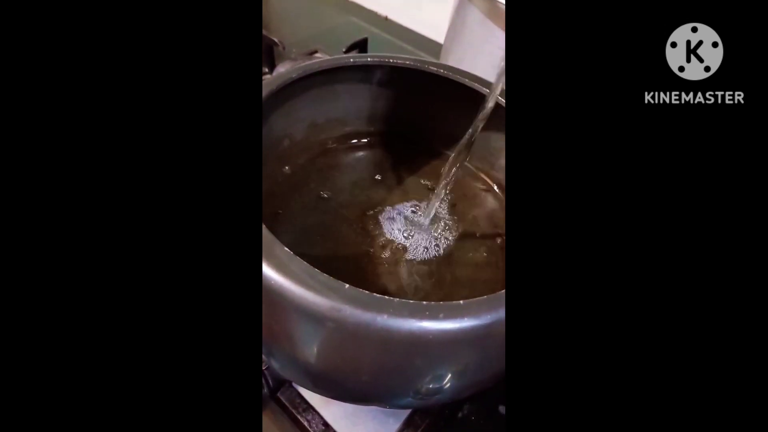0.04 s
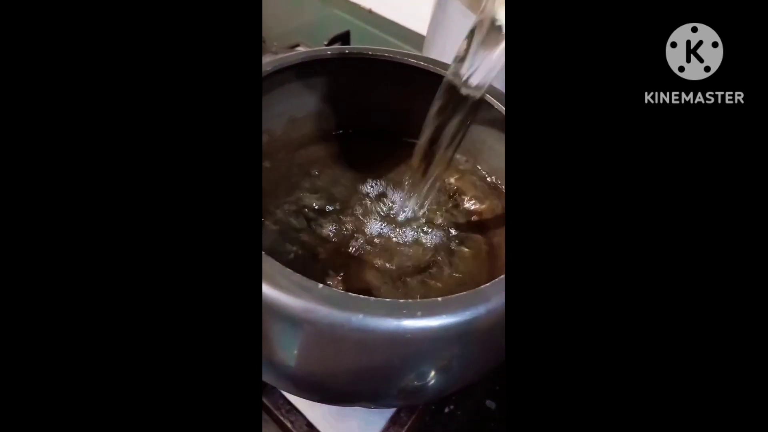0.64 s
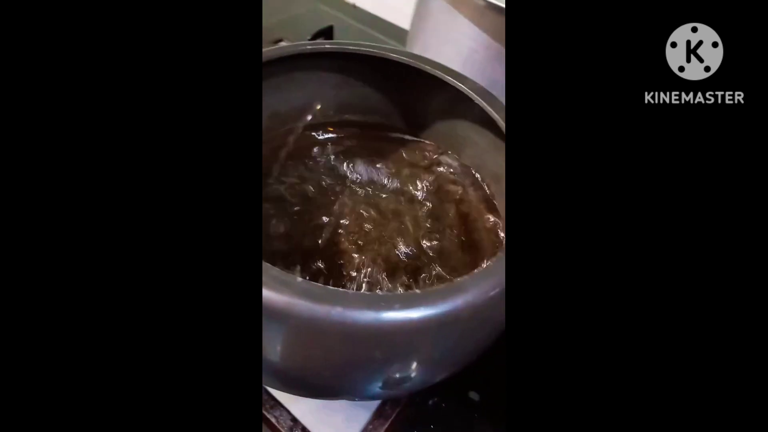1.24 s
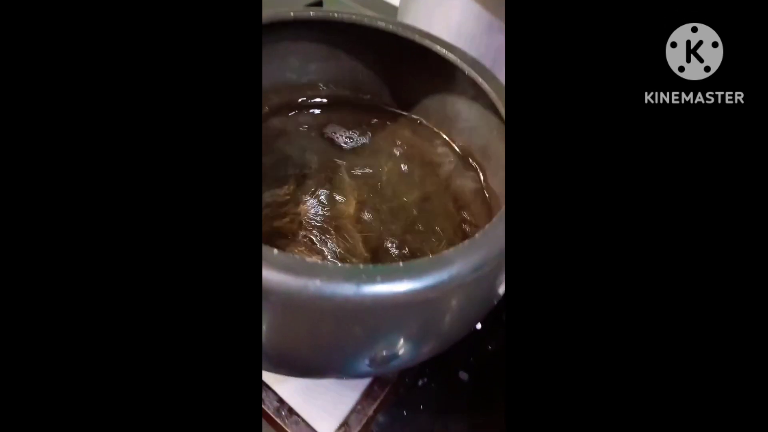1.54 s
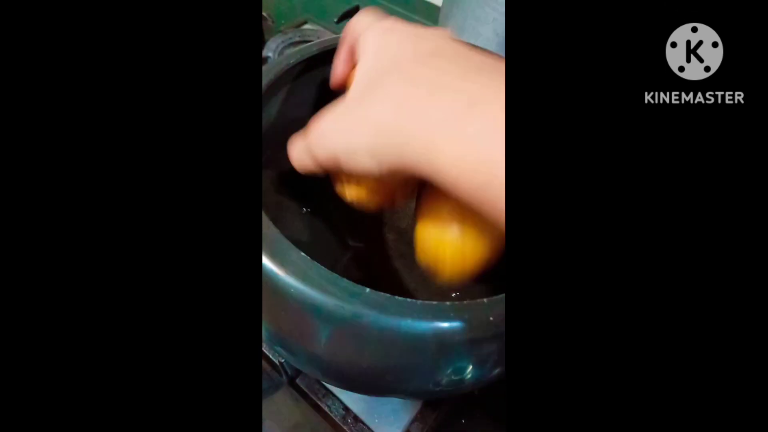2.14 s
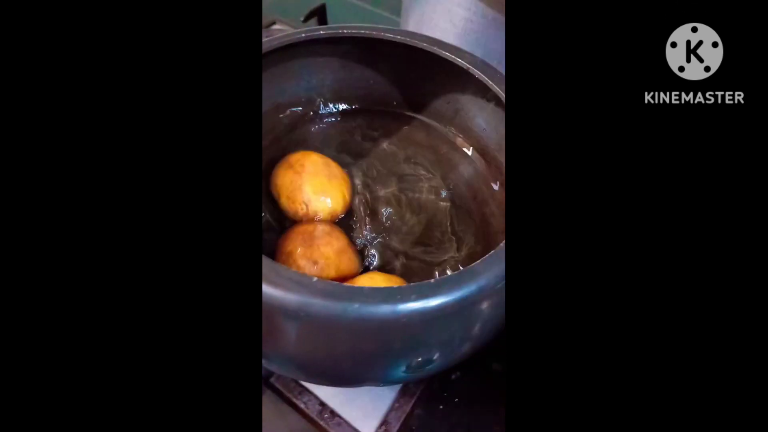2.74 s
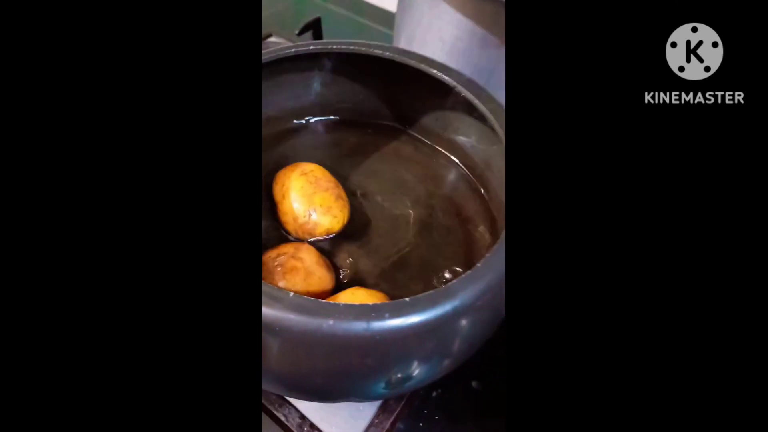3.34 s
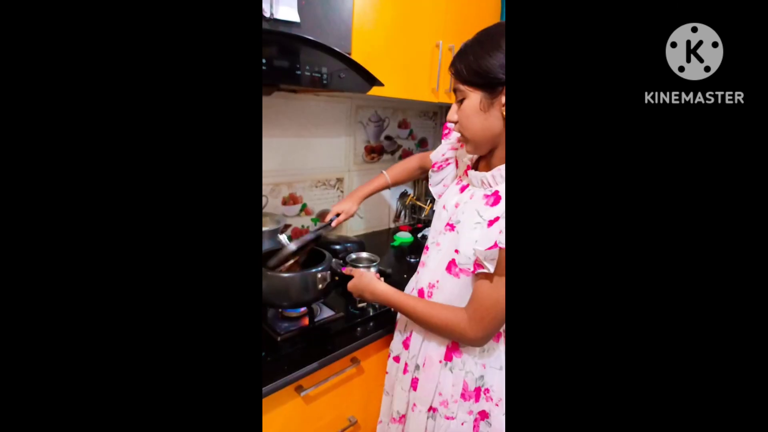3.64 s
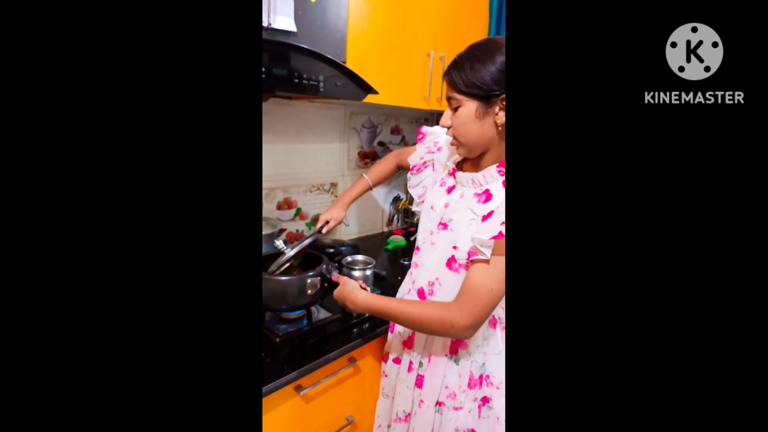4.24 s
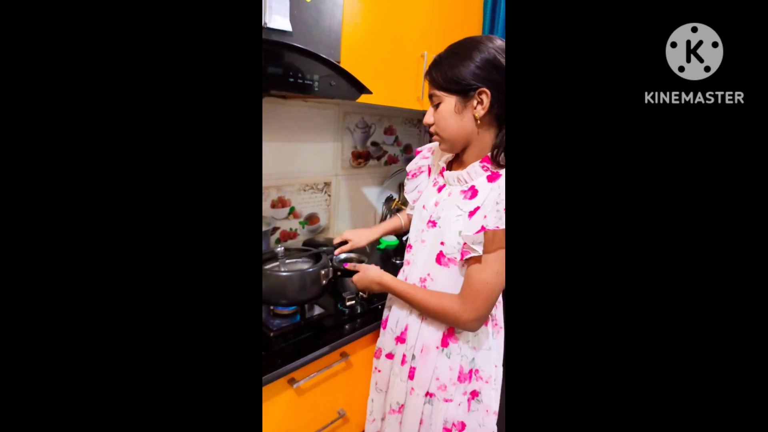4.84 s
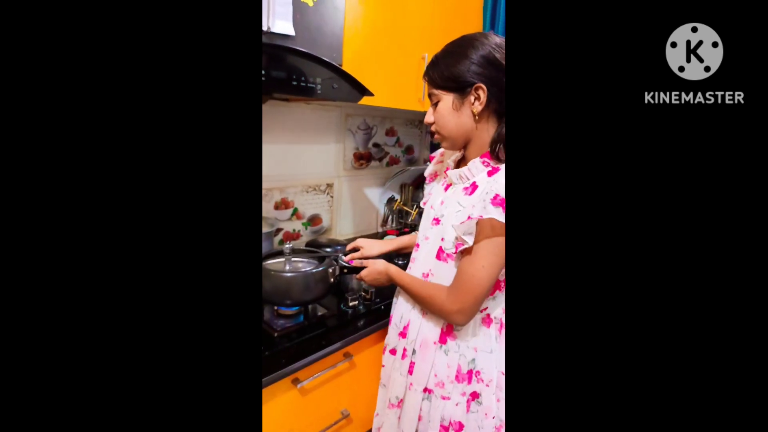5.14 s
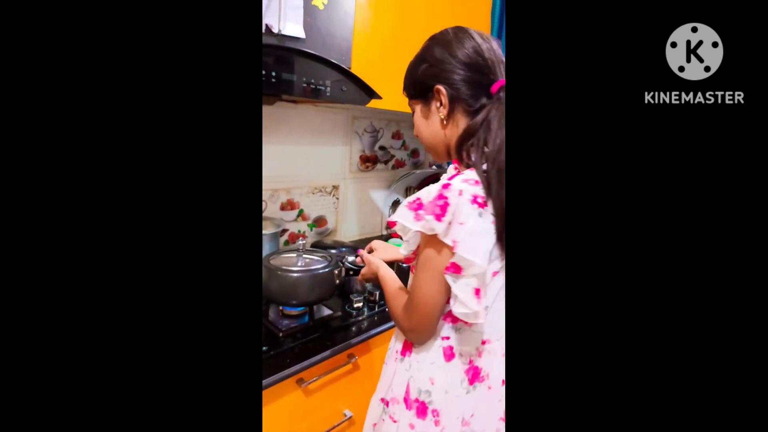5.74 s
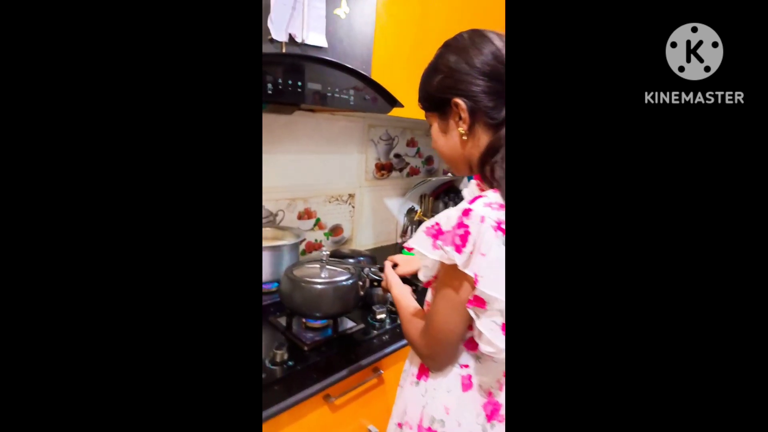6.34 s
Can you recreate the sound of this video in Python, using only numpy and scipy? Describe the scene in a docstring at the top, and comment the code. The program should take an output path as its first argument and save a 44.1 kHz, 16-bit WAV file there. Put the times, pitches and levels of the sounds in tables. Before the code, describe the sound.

Fizzing, gurgling water fills a pressure cooker, potatoes plop in, and its metal lid rattles and scrapes into place in a small kitchen.

```python
"""A small tiled kitchen. Water pours into a metal pressure cooker, fizzing and gurgling as it traps air;
a steel vessel knocks and rings. Potatoes plunge in, tap the wall and bump on the bottom. The lid clatters
in under the rim, scrapes round with a falling stick-slip groan and is clamped shut, jolting the stove.
The three actions are separate segments: the first two are cut off, and each time the next fades in."""
import sys
import numpy as np
from scipy import signal
from scipy.fft import rfft, irfft
from scipy.io import wavfile

SR = 44100
rng = np.random.default_rng(int(sys.argv[2]) if len(sys.argv) > 2 else 0)


def to_wav(s):
    """Save 16-bit WAV."""
    ch = np.atleast_2d(s).T  # columns
    pcm = np.round(np.clip(ch, -1, 1) * 32767)  # PCM
    wavfile.write(sys.argv[1], SR, pcm.astype(np.int16))


N = 286055
TIME_S, RING_S = np.arange(N) / SR, np.arange(SR) / SR

# pour, potatoes, lid: faded_in_s, cut_s, gain_db
SEGMENTS = [(0, 1.714, 0), (1.941, 3.573, 0.5), (3.76, 6.6, 1.5)]
# gushes of water: start_s, length_s, spray_db, gurgle_db
GUSHES = [(0, 0.26, -48, -38), (0.287, 0.93, -53.5, -48), (0.837, 0.12, -40.5, -42.5),
          (0.975, 0.098, -41, -41.5)]
# tiny bubbles: freq_hz, density_db
FIZZ_SPECTRUM = [(2000, 1), (5500, -3.5), (8000, -14.5), (14000, -21.5)]
# splashing jet: freq_hz, density_db
HISS_SPECTRUM = [(100, -24.5), (380, -3), (1000, 0), (3000, -4), (6000, -2), (14000, -19.5)]
# gulps of air: start_s, level_db, pitch_hz
GULPS = [(.02, -19.5, 6640), (.037, -22, 8130), (.133, -25, 12000), (.19, -24.5, 6240), (.203, -22, 724),
         (0.286, -21, 7240), (0.345, -26, 5060), (0.355, -20, 4000), (0.399, -29, 3280),
         (.700, -31.5, 2810), (0.805, -27.5, 4700), (0.845, -23.5, 3190), (1.007, -21.5, 4300),
         (1.018, -19.5, 3590), (1.022, -22, 617), (1.057, -21, 782), (1.074, -25.5, 3700),
         (1.124, -18, 779), (1.153, -26.5, 5830), (1.184, -22.5, 610), (2.348, -20.5, 9900),
         (2.348, -23, 5450), (2.358, -20.5, 730), (2.422, -27, 616), (2.522, -23.5, 5070),
         (2.528, -29, 2580), (2.574, -29.5, 2280)]
# stray drops: start_s, level_db
DROPS = [(0.409, -29.5), (1.363, -27.5), (1.389, -22.5), (2.876, -38)]
# steel pouring vessel: pitch_hz, level_db, t60_s
VESSEL_MODES = [(614, -9, 1), (676, -15, .7), (754, 8.5, 0.069), (834, 2.5, 0.6), (1134, -9.5, 1.5),
                (1215, -4.5, 1.5), (1750, -8.5, 0.084), (2070, -21, 6), (2510, -17.5, .13), (4130, -27, 6),
                (5580, -25.5, 0.66), (6600, -22, 0.68), (7550, -26, .8), (9090, -26.5, 0.55),
                (10100, -27, .6), (12000, -26, 0.55), (13400, -28.5, .7)]
# vessel knocks: start_s, ring_db, clack_db, treble_db, clack_t60_s
KNOCKS = [(1.532, -17, -19.5, -2, 0.057), (1.692, -42, -42.5, 19.5, 0.48)]
# vessel clack: freq_hz, density_db
CLACK_SPECTRUM = [(60, -44.5), (200, -27.5), (600, -7), (2300, -10), (3600, -20), (14000, -27)]
# clunk on the cooker: start_s, level_db
CLUNKS = [(0.016, 7.5)]
# cooker, clear modes: pitch_hz, level_db, t60_s
COOKER_MODES = [(473, 2.5, 0.12), (1092, -1, 0.33), (1650, 4, 0.42)]
# cooker, dense modes: freq_hz, density_db
COOKER_SPECTRUM = [(150, -36), (360, -9), (1630, -12.5), (2630, -28.5), (7000, -19.5), (14000, -44.5)]

# lid on rim, clear modes by pose: pitch_hz, tilted_db, flat_db, seated_db
LID_MODES = [(553, 7, 5.5, 0.5), (743, -9, 8.5, -10), (869, 9.5, -2, -11), (1065, 3.5, -11, 5),
             (1388, -3, 14.5, 5.5), (1520, 9.5, -3, -1.5), (1609, -3, 12, 7), (1880, 2.5, 3.5, -8),
             (2076, 8.5, 7, -2), (2207, 0, -12, 10), (2361, 1, -14, 6.5), (2546, -10, -1, 6),
             (3270, -15, 2, 1), (4000, -2.5, 1.5, 5.5), (4336, 1.5, -13, 0.5), (4588, -2, 0, -4),
             (5490, 0, -5, -7), (6190, 0, 3.5, -23), (6580, -11, 2.5, -6)]
# lid, dense modes: freq_hz, density_db
LID_SPECTRUM = [(30, -35), (110, -8.5), (300, -8.5), (720, -2), (1100, -8.5), (1500, 0), (2350, -7),
                (2750, -11), (4200, -11), (4980, -13.5), (6200, -10.5), (7800, -15.5), (14000, -23)]
# lid blows: start_s, level_db, treble_db
BLOWS = [(3.793, -6, -1), (3.816, -10, 5.5), (3.833, -12.5, 11), (4.319, -13.5, -2), (4.390, -9, -5.5),
         (4.407, -15, 11.5), (4.446, -10, 4), (4.597, 5, -3), (4.609, -16, 11.5), (4.648, -7.5, 9),
         (4.660, -5.5, 2), (4.765, -7.5, -8), (5.282, -11.5, 0), (5.297, -9, 0), (5.333, -18, 3),
         (5.363, -18, 8.5), (5.677, -12.5, -1), (5.694, -24, -3), (5.962, -20.5, -1), (6.119, -12, -0.5),
         (6.427, -26, 1)]
# pushes along the rim: start_s, length_s, level_db, treble_db
RUBS = [(3.735, 0.076, -39.5, 2), (4.265, 0.042, -35, -3), (3.807, 0.2, -38.5, 2.5), (4.302, 0.27, -27, 2),
        (4.686, 0.1, -25.5, 4.5), (4.803, 0.19, -30.5, -3.5), (4.91, 0.16, -26.5, -2),
        (5.083, 0.15, -34.5, -2.5), (5.261, 0.14, -28, 3.5), (5.59, 0.076, -37, 3.5),
        (5.677, 0.02, -23.5, 1), (5.935, 0.04, -37, -4), (6.381, 0.039, -35.5, -2.5)]
# lid stick-slip: start_s, length_s, slip_hz, level_db
GROANS = [(4.744, 0.064, 484, -26), (4.877, 0.1, 457, -31), (5.001, 0.062, 456, -27),
          (5.1, 0.082, 440, -28.5), (5.276, 0.032, 410, -19), (5.353, 0.028, 356, -20)]
# skids before the lid catches: start_s, length_s, level_db
SKIDS = [(3.727, 0.11, -36.5), (4.261, 0.052, -37)]
# skidding edge: centre_hz, level_db
SKID_BANDS = [(760, -0.5), (1520, -3), (2430, 0.5), (4300, -8)]
# cooker jolts on the stove: start_s, boom_db, grate_db
JOLTS = [(3.792, -34.5, -26), (4.389, -28.5, -28), (4.605, -29, -38), (5.619, -39, -30),
         (5.682, -39, -21.5), (5.966, -43, -36), (6.119, -37, -22), (6.43, -42, -31)]

# potatoes enter the water: start_s, spray_db, slosh_db
PLUNGES = [(2.347, -21, -27.5), (2.422, -39.5, -26), (2.522, -23.5, -34)]
# their spray: freq_hz, density_db
SPLASH_SPECTRUM = [(1000, -9), (2800, 4.5), (7000, 6.5), (11000, -2), (14000, -13)]
# potatoes on the bottom: start_s, length_s, level_db
BUMPS = [(2.02, 0.045, -45.5), (2.347, 0.01, -22), (2.378, .03, -24), (2.457, 0.034, -31.5),
         (2.523, 0.073, -38.5), (2.587, 0.053, -33.5), (2.664, 0.041, -35)]
# potatoes on the wall: start_s, level_db
TAPS = [(2.036, -32.5), (2.574, -37)]
# cooker wall: centre_hz, level_db
WALL_BANDS = [(3200, 4.5), (3820, -5), (4025, 1), (9300, -13)]
# kitchen background: freq_hz, density_db
AIR_SPECTRUM = [(25, -42), (90, -18.5), (180, -20.5), (345, -4.5), (600, -14), (1200, -14.5), (2440, -26),
                (3230, -33), (7000, -40), (14000, -53)]
# kitchen reverb: freq_hz, t60_s
ROOM_DECAY = [(100, 0.62), (2000, 0.31), (14000, 0.29)]

POUR_END_S, POTATOES_END_S = SEGMENTS[0][1], SEGMENTS[1][1]
LID_FLAT_S, LID_SEATED_S = 4.585, 4.76
RUB_RISE_S, RUB_T60_S = 0.018, 0.13


def stream(t60_cycles=42, foam_db=-55.5):
    """The jet splashes and drags air under: tiny bubbles fizz, large ones gurgle; foam fills the gaps."""
    spray_gain = gurgle_gain = amp(foam_db)
    for start_s, length_s, spray_db, gurgle_db in GUSHES:
        gush = stroke(start_s, length_s, rise_s=0.012, t60_s=0.11)
        spray_gain = spray_gain + amp(spray_db) * gush
        gurgle_gain = gurgle_gain + amp(gurgle_db) * gush
    fizz = np.zeros(N)
    for hz in np.geomspace(1900, 13500, 30):
        pings = convolve(clicks(hz / 120, spread_db=5), unit_energy(bubble(hz, t60_cycles / hz)))
        fizz += amp(lookup(FIZZ_SPECTRUM, hz)) * np.sqrt(hz) * pings
    hiss = amp(-3 + 4 * wander(60)) * noise(N, HISS_SPECTRUM)
    gurgle = sum(convolve(clicks(27, spread_db=12.8), bubble(hz, t60_cycles / hz))
                 for hz in np.geomspace(560, 2200, 20))
    gurgle = signal.sosfilt(signal.butter(2, 400, "high", fs=SR, output="sos"), gurgle)
    spray = amp(-1) * (unit_rms(fizz) + hiss)
    return (TIME_S < POUR_END_S) * (spray_gain * spray + gurgle_gain * amp(-5) * unit_rms(gurgle))


def bubble(hz, t60_s, glide=0.076):
    """Trapped air rings, rising in pitch as it nears the surface."""
    t = RING_S[:int(2 * t60_s * SR) + 2]
    envelope = (1 - np.exp(-t * hz)) * decay(t60_s)[:len(t)]
    return envelope * np.sin(2 * np.pi * hz * t * (1 + glide * t / t60_s))


def gulp(hz, t60_s, count=5):
    """A leading bubble, the smack that traps it and weaker ones that break off."""
    out = bubble(hz, t60_s)
    add(out, 0, amp(-9) * burst(hz, t60_s, spread=1.6))
    for detune, lag in zip(rng.normal(0, 0.16, count), rng.uniform(0.1, 0.7, count)):
        add(out, lag * t60_s, amp(-7) * bubble(hz * np.exp(detune), t60_s / 2))
    return out


def plops(t60_at_1khz_s=0.045):
    """Air is gulped under, small bubbles dying sooner; stray drops smack the water."""
    out = np.zeros(N)
    for start_s, db, hz in GULPS:
        add(out, start_s, amp(db) * gulp(hz, t60_at_1khz_s * (hz / 1000) ** -0.6))
    for start_s, db in DROPS:
        add(out, start_s, amp(db) * burst(8000, t60_s=0.067, spread=2.2))
    return out


def knocks(dense_count=40):
    """The steel vessel clacks, rattles and rings on; the heavy cooker only clunks."""
    clunk = metal(COOKER_MODES, COOKER_SPECTRUM, dense_t60_s=0.39, clear_db=-5)
    # high modes split into beating clusters
    clusters = [(hz * rng.normal(1, hz / 3e5), db - 9, t60_s)
                for hz, db, t60_s in 9 * VESSEL_MODES if hz > 5000]
    dense = sum(gain * np.sin(2 * np.pi * (hz * RING_S + rng.random()))
                for hz, gain in zip(rng.uniform(800, 3200, dense_count), rng.rayleigh(1, dense_count)))
    ring = modes(VESSEL_MODES + clusters, sway=-0.0027) + amp(-26) * unit_rms(dense) * decay(0.7)
    ring += amp(-5) * burst(680, t60_s=0.9, spread=1.18)  # rattle
    out = np.zeros(N)
    for start_s, ring_db, clack_db, treble_db, t60_s in KNOCKS:
        clack = noise(SR, CLACK_SPECTRUM) * decay(t60_s)
        add(out, start_s, brighten(amp(ring_db) * ring + amp(clack_db) * clack, treble_db, split_hz=6300))
    for start_s, db in CLUNKS:
        add(out, start_s, amp(db) * clunk)
    return out * (TIME_S < POUR_END_S)


def lid(blow_gain_db=16, mode_t60_s=0.073, spots=5, dwell_s=0.04):
    """Blows and rubbing ring the lid; each pose and contact spot on the rim favours other modes."""
    force = rubbing()
    for start_s, db, treble_db in BLOWS:
        chatter_s = 0.009 * 2 ** (treble_db / 6)  # glancing blows: brighter, longer
        rebounds = unit_energy(sparse_noise() * np.exp(-RING_S / chatter_s))
        rebounds[32] += 0.16  # first touch
        add(force, start_s, amp(db + blow_gain_db) * brighten(unit_energy(rebounds), treble_db))
    spot_now = (TIME_S / dwell_s).astype(int) % spots
    pose_now = np.searchsorted([LID_FLAT_S, LID_SEATED_S], TIME_S)
    out = np.zeros(N)
    for spot in range(spots):
        ringing = np.zeros(N)
        for pose in range(3):  # tilted, flat, seated
            table = [(hz * rng.normal(1, 0.007), pose_db[pose] + rng.normal(0, 2), mode_t60_s)
                     for hz, *pose_db in LID_MODES]
            response = metal(table, LID_SPECTRUM, dense_t60_s=0.051, clear_db=-0.5)
            ringing += convolve(force * (pose_now == pose) * (spot_now == spot), response)
        out += kitchen(ringing, wet_db=-4)
    return out


def rubbing(graze_db=-50.5):
    """Force of the lid catching on the rim; between pushes it still grazes."""
    catches = unit_rms(clicks(2500, spread_db=5.7))
    force = amp(graze_db) * catches * (TIME_S > POTATOES_END_S)
    for start_s, length_s, db, treble_db in RUBS:
        push = np.roll(brighten(catches, treble_db), rng.integers(N))
        force += amp(db) * stroke(start_s, length_s, RUB_RISE_S, RUB_T60_S) * push
    return force * amp(2 * wander(11.4))


def groan(harmonics_db=(7.5, -20, -4.5, -14, -1), flutter_db=3):
    """Uneven stick-slip of the turning lid, slower as it tightens."""
    out = np.zeros(N)
    phase_per_hz = wobbly_phase(1, jitter=0.045, rate_hz=119.7)
    for start_s, length_s, slip_hz, db in GROANS:
        envelope = stroke(start_s, length_s, rise_s=0.015, t60_s=0.1)
        active = envelope > amp(-60)
        phase = slip_hz * phase_per_hz[active]
        slips = sum(gain * np.sin(k * phase) for k, gain in enumerate(amp(harmonics_db), 1))
        out[active] += amp(db) * envelope[active] * unit_rms(slips)
    return out * amp(flutter_db * wander(99))


def squeal():
    """The rim sings briefly as the lid slips under it."""
    envelope = stroke(start_s=4.648, length_s=0.022, rise_s=0.014, t60_s=0.13)
    return amp(-19) * envelope * np.sin(wobbly_phase(10280, jitter=0.034, rate_hz=301))


def skids():
    """The tilted lid's edge skids on the rim and sings in narrow bands."""
    out = np.zeros(N)
    for start_s, length_s, db in SKIDS:
        bands = sum(amp(band_db) * burst(hz, t60_s=np.inf, spread=1.04) for hz, band_db in SKID_BANDS)
        add(out, start_s, amp(db) * bands * stroke(0, length_s, RUB_RISE_S, RUB_T60_S)[:SR])
    return out


def plunges():
    """A potato throws up spray, water sloshes back and the hollow closes."""
    out = np.zeros(N)
    for start_s, spray_db, slosh_db in PLUNGES:
        spray = noise(SR, SPLASH_SPECTRUM) * decay(0.076) / 2
        slosh = burst(750, t60_s=0.15)
        hollow = amp(-5) * burst(370, t60_s=0.44)
        add(out, start_s, amp(spray_db) * spray + amp(slosh_db) * (slosh + hollow))
    return out


def bumps():
    """Potatoes land with a thud; the bottom rumbles while they roll."""
    out = np.zeros(N)
    rumble = np.sin(wobbly_phase(94, jitter=0.082, rate_hz=37))
    for start_s, length_s, db in BUMPS:
        out += amp(db) * stroke(start_s, length_s, rise_s=0.0087, t60_s=0.13) * rumble
        add(out, start_s, amp(db + 4) * burst(158, t60_s=0.18, spread=1.36))
    return out


def taps(wall_t60_s=0.39):
    """Potatoes touch the wall: a wet tick and a chink, its modes smeared by the water."""
    out = np.zeros(N)
    for start_s, db in TAPS:
        chink = sum(amp(band_db) * burst(hz, wall_t60_s, spread=1.048) for hz, band_db in WALL_BANDS) / 2
        dense = amp(-5) * burst(2700, wall_t60_s, spread=1.53)
        tick = amp(-7) * burst(4400, t60_s=0.18)
        add(out, start_s, amp(db) * (chink + dense + tick))
    return out


def jolts(stove_hz=88):
    """The stove top booms and its grate knocks under the full cooker."""
    out = np.zeros(N)
    boom = stroke(0, 0.014, rise_s=0.014, t60_s=0.36)[:SR] * np.sin(2 * np.pi * stove_hz * RING_S)
    for start_s, boom_db, grate_db in JOLTS:
        add(out, start_s, amp(boom_db) * boom + amp(grate_db) * burst(290, t60_s=0.33, spread=1.55))
    return out


def kitchen(x, wet_db):
    """Direct sound plus the tail of a small tiled room."""
    echoes = sparse_noise() * (RING_S > 0.004)
    hz, t, bins = signal.stft(echoes, SR, nperseg=256)
    bins = bins * amp(-60 * t / lookup(ROOM_DECAY, hz)[:, None])
    _, tail = signal.istft(bins, SR, nperseg=256)
    return (x + amp(wet_db) * convolve(x, unit_energy(tail))) / np.hypot(1, amp(wet_db))


def background(level_db=-44.5, waver_db=0.5):
    """Steady, slightly wavering rush of the kitchen."""
    return amp(level_db + waver_db * wander(12)) * noise(N, AIR_SPECTRUM)


def metal(table, spectrum, dense_t60_s, clear_db):
    """Impulse response of a pan: dense short modes plus clear ones."""
    dense = noise(SR, spectrum) * decay(dense_t60_s)
    return unit_energy(unit_energy(dense) + amp(clear_db) * unit_energy(modes(table)))


def modes(table, sway=0, sway_hz=3.4):
    """Ring of a struck object; sloshing water sways each pitch by its own amount."""
    slosh_s = sway * np.sin(2 * np.pi * sway_hz * RING_S) / (2 * np.pi * sway_hz)
    out = np.zeros(SR)
    for hz, db, t60_s in table:
        cycles = hz * (RING_S + 2 * rng.random() * slosh_s) + rng.integers(2) / 2
        out += amp(db) * decay(t60_s) * np.sin(2 * np.pi * cycles)
    return out


def burst(hz, t60_s, spread=1.7):
    """Noise band with a sharp start."""
    edges_hz = [hz / spread, min(hz * spread, 18000)]
    band = signal.sosfilt(signal.butter(3, edges_hz, "band", fs=SR, output="sos"), rng.standard_normal(SR))
    return unit_rms(band) * decay(t60_s) / 2


def brighten(x, treble_db, split_hz=2900):
    """Treble shelf: harder contact is brighter."""
    low = signal.sosfiltfilt(signal.butter(3, split_hz, fs=SR, output="sos"), x)
    return low + amp(treble_db) * (x - low)


def stroke(start_s, length_s, rise_s, t60_s):
    """Gesture envelope: rise, hold, decay."""
    t = TIME_S - start_s
    return np.clip(t / rise_s, 0, 1) * amp(-60 * np.maximum(t - length_s, 0) / t60_s)


def decay(t60_s):
    """Exponential decay, 1 s long."""
    return amp(-60 * RING_S / t60_s)


def clicks(per_s, spread_db):
    """Random clicks of uneven size."""
    signs = (rng.random(N) < per_s / SR) * rng.choice([-1, 1], N)
    return signs * amp(spread_db * np.minimum(rng.exponential(1, N), 3))


def sparse_noise():
    """1 s of noise, a tenth of its samples kept."""
    return rng.standard_normal(SR) * (rng.random(SR) < 0.1)


def noise(samples, spectrum):
    """Shaped noise, rms 1."""
    gain = amp(lookup(spectrum, np.fft.rfftfreq(samples, 1 / SR)))
    return unit_rms(irfft(rfft(rng.standard_normal(samples)) * gain, samples))


def wander(rate_hz):
    """Random drift, rms 1."""
    lowpass = np.exp(-(np.fft.rfftfreq(N, 1 / SR) / rate_hz) ** 2)
    return unit_rms(irfft(rfft(rng.standard_normal(N)) * lowpass, N))


def wobbly_phase(hz, jitter, rate_hz):
    """Phase of an unsteady tone, in radians."""
    return 2 * np.pi * np.cumsum(hz * (1 + jitter * wander(rate_hz))) / SR


def lookup(table, hz):
    """Interpolate over log frequency."""
    table_hz, values = np.transpose(table)
    return np.interp(np.log(hz + 1), np.log(table_hz + 1), values)


def add(mix, start_s, sound):
    """Mix in at start_s."""
    part = mix[round(start_s * SR):][:len(sound)]
    part += sound[:len(part)]


def convolve(x, response):
    """Convolve, keeping the length."""
    return signal.oaconvolve(x, response)[:len(x)]


def amp(db):
    """Decibels to gain."""
    return 10 ** (np.asarray(db) / 20)


def unit_rms(x):
    """Scale to rms 1."""
    return x / np.sqrt(np.mean(x ** 2) + 1e-20)


def unit_energy(x):
    """Scale to energy 1."""
    return x / (np.linalg.norm(x) + 1e-12)


def scene():
    """Water near, lid further off; mono on two channels."""
    near = kitchen(stream() + plops() + plunges() + taps(), wet_db=-9) + kitchen(knocks(), wet_db=-14)
    far = lid() + jolts() + kitchen(groan() + squeal() + skids(), wet_db=-8)
    return np.tile(near + bumps() + far + background(), (2, 1))


def record(dry, low_hz=47, high_hz=14100, fade_db_per_s=386, cut_db_per_s=12000):
    """Peaks are softly rounded and a small microphone thins the bass; then segment fades, cuts and the band
    limit."""
    heard = signal.sosfilt(signal.butter(3, low_hz, "high", fs=SR, output="sos"), np.tanh(dry))
    gain = np.zeros(N)
    for faded_in_s, cut_s, db in SEGMENTS:
        fade_db = fade_db_per_s * np.maximum(faded_in_s - TIME_S, 0)
        cut_db = cut_db_per_s * np.maximum(TIME_S - cut_s, 0)
        gain += amp(db - fade_db - cut_db)
    lowpass = signal.firwin(401, high_hz, window=("kaiser", 8), fs=SR)
    return signal.oaconvolve(heard * gain, lowpass[None], "same")


dry = scene()
out = record(dry)
to_wav(out)
```